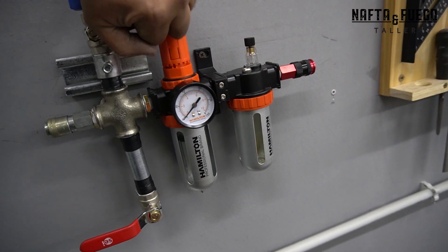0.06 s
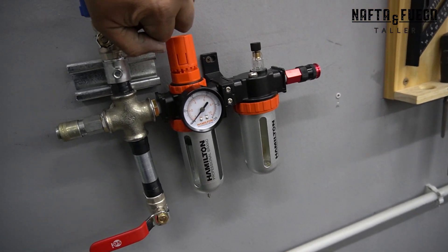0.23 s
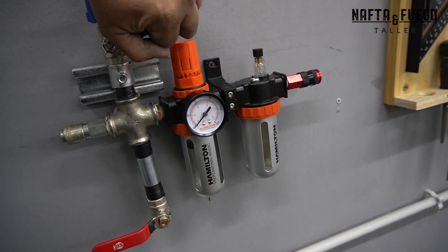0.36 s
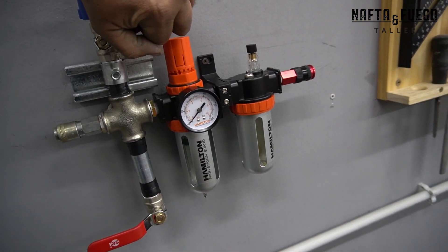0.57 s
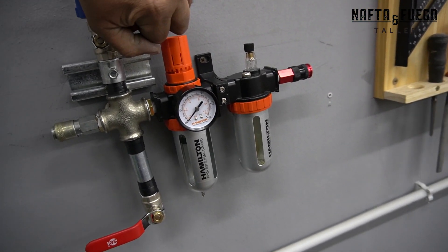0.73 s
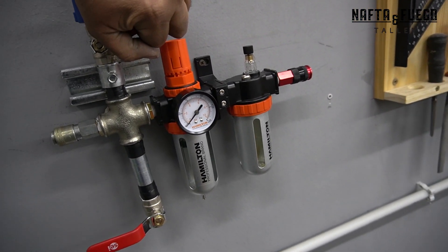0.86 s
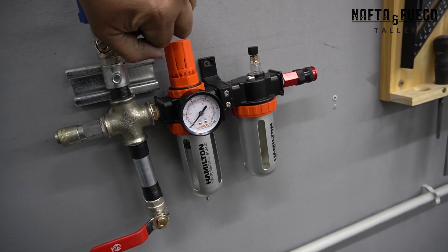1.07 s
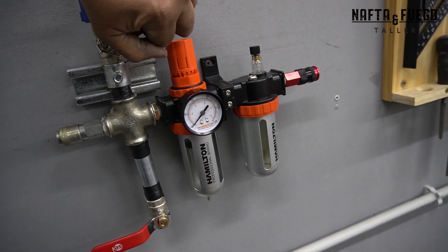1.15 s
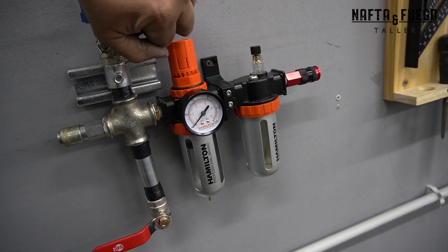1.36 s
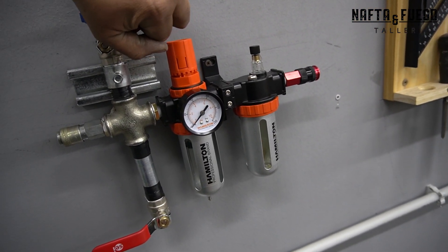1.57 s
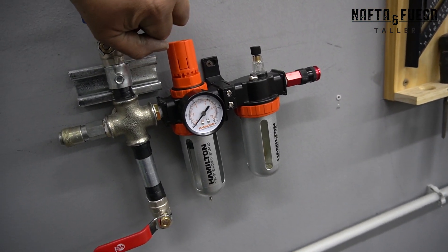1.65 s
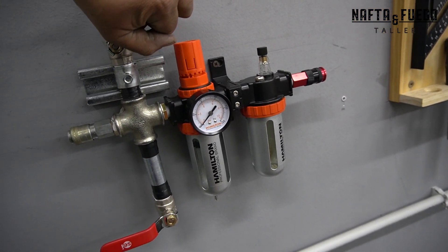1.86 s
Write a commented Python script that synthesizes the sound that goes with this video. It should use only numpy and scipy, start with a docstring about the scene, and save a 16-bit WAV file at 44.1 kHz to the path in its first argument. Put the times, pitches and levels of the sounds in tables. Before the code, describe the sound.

A compressed-air valve is turned by hand: soft rub, a quick crackling burst of air, one loud metallic snap, then a resonant hiss fading within half a second; dull knocks follow. Close stereo microphones, small workshop.

```python
"""A compressed-air valve, turned open by hand in a small workshop, heard close by on two microphones.
Air (shaped noise) swells through the gap; the valve catches and snaps home (cracks, metal rings, a pop).
The regulator bowls fill with a fading, resonant hiss; a thin leak stays and a broader hiss grows late.
Around it: the hand's rub, a faint squeak (gliding tones), the snap's low thump and later dull knocks
(decaying sines, two with a slight rattle), a tiny whistle (a gliding tone) and low room rumble (noise)."""
import sys
import numpy as np
from scipy import signal
from scipy.fft import rfft, irfft
from scipy.io import wavfile

SR = 44100
rng = np.random.default_rng(int(sys.argv[2]) if len(sys.argv) > 2 else 0)


def unload_audio(sound):
    """Save the sound as a 16-bit wav file, at the path given as the first command line argument."""
    columns = np.transpose(np.atleast_2d(sound))
    # keep every value between -1 and 1, then stretch to whole-number steps
    steps = np.round(np.clip(columns, -1, 1) * 32767)
    wavfile.write(sys.argv[1], SR, steps.astype(np.int16))


N = 83790  # length [samples], 1.9 s
TIME = np.arange(N) / SR  # [s]
FREQUENCY = np.arange(N // 2 + 1) * SR / N  # [Hz]


def undb(db):
    """Decibels to gain."""
    return 10 ** (np.asarray(db) / 20)


def curve(rows):
    """Gain over time from (time [s], level [dB]) points; silent before the first."""
    times, levels = np.array(rows, float).T
    return undb(np.interp(TIME, times, levels)) * (TIME >= times[0])


def lows(x, hz):
    """Gentle low-pass that adds no delay."""
    sos = signal.butter(2, min(hz, SR * .45), fs=SR, output="sos")
    return signal.sosfiltfilt(sos, x)


def waver(hz):
    """Random wandering up to a given rate, spread 1."""
    slow = lows(rng.standard_normal(N + SR), hz)
    x = slow[SR // 2:SR // 2 + N]  # away from the filter's edges
    return x / x.std()


def burst(start, decay):
    """Sudden onset, exponential fall."""
    age = TIME - start
    return (age >= 0) * np.exp(-np.abs(age) / decay)


def noise(colour, peaks=()):
    """Noise of rms 1 with a broad colour, and resonances or notches on top."""
    hz, db = np.array(colour, float).T
    shape = np.interp(np.log(np.maximum(FREQUENCY, 1)), np.log(hz), db)
    for centre, width, lift in peaks:
        shape = shape + lift / (1 + (2 * (FREQUENCY - centre) / width) ** 2)
    x = irfft(rfft(rng.standard_normal(N)) * undb(shape), N)
    return x / x.std()


MICROPHONE_LAG_S = .000016


def microphones(x):
    """The sound reaches the left microphone a little before the right."""
    delay = np.exp(-2j * np.pi * FREQUENCY * MICROPHONE_LAG_S)
    return np.array([x, irfft(rfft(x) * delay, N)])


ALIKE_BELOW_HZ, BASS_SCATTER = 1100, .3  # BASS_SCATTER: each side's own share of the lows


def scatter(n):
    """Two scattered fields from three noises: the long waves reach both microphones nearly alike."""
    own = lows(n[:2], ALIKE_BELOW_HZ)
    common = lows(n[2], ALIKE_BELOW_HZ)
    return n[:2] - own + BASS_SCATTER * own + np.sqrt(1 - BASS_SCATTER ** 2) * common


# share of the power common to both microphones
AIR_LIKENESS, HISS_LIKENESS, CLICK_LIKENESS = .72, .45, .8


def wide(colour, likeness, peaks=()):
    """Stereo noise: a part shared by both microphones and a part scattered by the wall."""
    scattered = scatter(np.array([noise(colour, peaks) for _ in range(3)]))
    shared = microphones(noise(colour, peaks))
    return np.sqrt(likeness) * shared + np.sqrt(1 - likeness) * scattered


def pan(x, db):
    """Leans a stereo sound to the left by db (negative: to the right)."""
    return x * undb(np.array([[db], [-db]]) / 2)


# 60 dB decay of the lows and of the treble, wait before the first reflection
ROOM_T60_S, ROOM_TREBLE_T60_S, ROOM_DELAY_S = .57, .14, .0068
ROOM_SPLIT_HZ = 7000


def room(x, wet_db):
    """Adds the diffuse workshop tail; the treble dies sooner."""
    n = scatter(rng.standard_normal((3, N)))
    low = lows(n, ROOM_SPLIT_HZ)
    low_tail = low * undb(-60 * TIME / ROOM_T60_S)
    treble_tail = (n - low) * undb(-60 * TIME / ROOM_TREBLE_T60_S)
    tail = (low_tail + treble_tail) * (TIME > ROOM_DELAY_S)
    tail = tail / np.sqrt(np.sum(tail ** 2) / 2)
    return x + undb(wet_db) * signal.fftconvolve(x, tail, axes=1)[:, :N]


# colour of the room's rumble: (frequency [Hz], level [dB])
RUMBLE_COLOUR = [(20, -17), (40, -2), (62, 7), (90, -0.5), (140, -3), (200, -17), (280, -24.5), (430, -21),
                 (700, -51), (1500, -56), (4000, -71), (15000, -60)]
RUMBLE_DB, RUMBLE_SCATTER_DB = -58, -42  # scatter: relative to the shared rumble


def rumble():
    """Low room noise, nearly the same at both microphones."""
    shared = microphones(noise(RUMBLE_COLOUR))
    scattered = np.array([noise(RUMBLE_COLOUR) for _ in range(2)])
    return undb(RUMBLE_DB) * (shared + undb(RUMBLE_SCATTER_DB) * scattered)


# level of the hand's rub: (time [s], level [dB])
RUB_LEVEL = [(0, -67.5), (.11, -69), (.2, -78), (.3, -95)]
# colour of the rub: (frequency [Hz], level [dB])
RUB_TONE = [(200, -17.5), (420, 5), (900, -12.5), (1800, -13.5), (2150, -6), (2700, -19), (3600, -30),
            (9000, -35.5), (11000, -57)]


def rub():
    """The hand rubs on the valve: soft noise, mostly low-pitched, that fades."""
    return wide(RUB_TONE, AIR_LIKENESS) * curve(RUB_LEVEL)


def gliding_tone(rows, wobble, ratio=1):
    """A thin unsteady sine along (time [s], frequency [Hz], level [dB]) points."""
    times, hz, db = np.array(rows, float).T
    pitch = ratio * np.interp(TIME, times, hz) * (1 + wobble * waver(730))
    level = undb(np.interp(TIME, times, db)) * (TIME > times[0]) * (TIME < times[-1])
    return microphones(level * np.sin(2 * np.pi * np.cumsum(pitch) / SR))


# glide of the squeak's lower partial: (time [s], frequency [Hz], level [dB])
SQUEAK_GLIDE = [(.05, 7400, -104), (.08, 8400, -90), (.11, 8950, -93), (.165, 9350, -96)]
SQUEAK_RATIO, SQUEAK_UPPER_DB = 1.075, -1  # upper partial against the lower
SQUEAK_WOBBLE = .02  # spread of the pitch, as a share
SQUEAK_FLICKER_DB, SQUEAK_FLICKER_HZ = 4, 60


def squeak():
    """The turning valve squeaks faintly: two rising, wobbling partials that flicker in level together."""
    lower = gliding_tone(SQUEAK_GLIDE, SQUEAK_WOBBLE)
    upper = gliding_tone(SQUEAK_GLIDE, SQUEAK_WOBBLE, SQUEAK_RATIO)
    flicker = undb(SQUEAK_FLICKER_DB * waver(SQUEAK_FLICKER_HZ))
    return (lower + undb(SQUEAK_UPPER_DB) * upper) * flicker


# level of the rush through the opening valve: (time [s], level [dB])
RUSH_LEVEL = [(.158, -79), (.176, -57.5), (.186, -52), (.2, -42.5), (.224, -34), (.244, -30.5), (.255, -54),
              (.28, -82), (.34, -110)]
# colour of the rush: (frequency [Hz], level [dB])
RUSH_TONE = [(200, -40), (700, -35), (1200, -13.5), (1800, -12), (2600, 0), (3500, -6.5), (4500, 0.5),
             (6600, -8.5), (8000, -5.5), (8800, -7), (9900, 4), (11400, -5.5), (12800, 4.5), (13600, -3.5),
             (16000, -3.5)]
RUSH_SPLIT_HZ, RUSH_LOW_LAG_S = 5000, .015  # the lows come in as the gap widens
CRACKLE_HZ, CRACKLE_DB = 505, 1  # quick unevenness: top rate, spread


def rush():
    """Air swells and crackles through the widening gap, treble first."""
    jet = wide(RUSH_TONE, AIR_LIKENESS) * undb(CRACKLE_DB * waver(CRACKLE_HZ))
    low = lows(jet, RUSH_SPLIT_HZ)
    flow = curve(RUSH_LEVEL)
    late_flow = np.interp(TIME - RUSH_LOW_LAG_S, TIME, flow)
    # the lows rise late but fall with the treble
    return (jet - low) * flow + low * np.minimum(flow, late_flow)


# clicks of the slipping valve: small catches, the loud snap home, one faint click after:
# (time [s], level [dB])
CLICK_EVENTS = [(0.205, -40), (0.218, -28.5), (0.2278, -26), (0.2309, -26.5), (0.2394, -24),
                (0.2411, -25.5), (.2482, -19), (0.2609, -39)]
# short ring of the valve body: (frequency [Hz], level [dB], 60 dB decay [s])
BODY_MODES = [(1320, -11.5, 0.0051), (2374, -7.5, 0.02), (2902, -8, 0.023), (4373, -8.5, 0.025),
              (4820, -6.5, 0.04), (5380, -10.5, .022), (7250, -15, 0.019), (7710, -6.5, 0.017),
              (7947, -9, 0.015), (8048, -16, 0.021), (11950, -16, .03)]
# colour of the crack that starts each click: (frequency [Hz], level [dB])
CRACK_TONE = [(300, -29), (900, -27), (1400, -21), (2400, 3), (3500, -5.5), (4900, 4), (6200, -5),
              (8000, 5), (9000, -9), (12000, -0.5), (16000, -20)]
BODY_DB, CRACK_DB = -5, -.5  # relative to the click
CRACK_S, CONTACT_S = .0018, .00022  # decay of the crack, rise of each click


def clicks():
    """Every click gives a sharp crack and rings the metal body as decaying sines."""
    out = 0
    for start, db in CLICK_EVENTS:
        age = np.maximum(TIME - start, 0)
        ring = 0
        for hz, mode_db, t60 in BODY_MODES:
            phase = 2 * np.pi * (hz * age + rng.random())
            ring = ring + undb(mode_db - 60 * age / t60) * np.sin(phase)
        crack = wide(CRACK_TONE, CLICK_LIKENESS) * burst(start, CRACK_S)
        contact = 1 - np.exp(-age / CONTACT_S)
        click = undb(BODY_DB) * microphones(ring) + undb(CRACK_DB) * crack
        out = out + undb(db) * click * contact
    return out


RUSH_ROOM_DB, CLICK_ROOM_DB = -6, -10.5
PAN_SPLIT_HZ, LOW_PAN_DB, HIGH_PAN_DB = 3500, -2.8, 1


def valve():
    """Rush and clicks in the room: below the split they lean right, the treble left; the pop is central."""
    out = room(rush(), RUSH_ROOM_DB) + room(clicks(), CLICK_ROOM_DB)
    low = lows(out, PAN_SPLIT_HZ)
    return pan(low, LOW_PAN_DB) + pan(out - low, HIGH_PAN_DB) + pop()


# level of the thin leak: (time [s], level [dB])
LEAK_LEVEL = [(.2, -91), (.4, -65), (.9, -58), (1.2, -56.5), (1.5, -58.5), (1.9, -57)]
# colour of the leak: (frequency [Hz], level [dB])
LEAK_TONE = [(1000, -24), (2300, -27.5), (3300, -33.5), (5200, -32.5), (6100, -23), (7500, -19),
             (8200, -15.5), (10500, -14), (11500, -6), (13500, -0.5), (16000, -10)]


def leak():
    """A thin, treble-heavy hiss grows and stays on, slightly to the left."""
    return pan(wide(LEAK_TONE, HISS_LIKENESS) * curve(LEAK_LEVEL), .5)


# level of the hiss that fills the bowls: (time [s], level [dB])
FILL_LEVEL = [(.235, -63), (.262, -42.5), (.33, -44), (.39, -46.5), (.435, -45.5), (.55, -48), (.61, -52.5),
              (.66, -55.5), (.72, -60.5), (.85, -72.5)]
# colour of the filling hiss: (frequency [Hz], level [dB])
FILL_TONE = [(300, -8.5), (900, -17.5), (1700, -18.5), (4200, -15), (6000, -1), (8400, -5), (11000, -5),
             (13000, 0), (16000, -6)]
# resonances of the air passages and one notch (negative lift): (frequency [Hz], width [Hz], lift [dB])
PASSAGE_SHAPE = [(2380, 1100, 12), (3585, 180, 13.5), (5050, 63, 14.5), (5236, 156, -28), (5940, 1040, 6),
                 (6960, 190, 6), (7960, 130, 8.5), (9440, 520, 7), (9980, 250, 9), (12190, 1090, 11),
                 (12900, 890, 3.5), (15000, 630, 12.5)]


def fill():
    """The bowls fill through ringing passages: resonant noise and the jet's notes, leaning left."""
    hiss = wide(FILL_TONE, HISS_LIKENESS, PASSAGE_SHAPE) * curve(FILL_LEVEL)
    return pan(hiss + singing(), 1.8)


# low thump of the valve's snap (first two rows), then dull knocks in the fitting:
# (time [s], level [dB], pitch [Hz], decay [s], rattle level [dB])
THUD_EVENTS = [(0.2493, -24, 323, 0.00096, -46), (0.2495, -40, 150, 0.0027, -78),
               (0.5294, -36, 312, 0.0025, -99), (1.0138, -27.5, 255, 0.0033, -53),
               (1.0237, -28.5, 262.5, 0.0071, -75), (1.0409, -35.5, 219, 0.0086, -77)]
# colour of the rattle: (frequency [Hz], level [dB])
RATTLE_TONE = [(500, 7.5), (900, -6), (1200, -1.5), (1700, -13), (2100, 0.5), (2800, -1.5), (3400, -21),
               (5500, -16), (6500, 1), (7700, -16), (10300, -4), (11000, 11), (11700, -9.5), (16000, 0.5)]
THUD_RISE_S, RATTLE_S = .00049, .02  # rise of a thud, decay of a rattle
THUD_TOP_HZ, THUD_ROOM_DB = 480, -16


def thump_and_knocks():
    """Short low thuds (decaying sines), two of them with a slight rattle, in the room."""
    thuds, shake = 0, 0
    for start, db, hz, decay, rattle_db in THUD_EVENTS:
        age = np.maximum(TIME - start, 0)
        envelope = (1 - np.exp(-age / THUD_RISE_S)) * np.exp(-age / decay)
        thuds = thuds - undb(db) * envelope * np.sin(2 * np.pi * hz * age)
        shake = shake + undb(rattle_db) * burst(start, RATTLE_S)
    rattle = shake * wide(RATTLE_TONE, AIR_LIKENESS)
    return room(microphones(lows(thuds, THUD_TOP_HZ)) + rattle, THUD_ROOM_DB)


# colour of the pop of pressure: (frequency [Hz], level [dB])
POP_TONE = [(100, -26), (300, -2), (600, 2), (900, -7.5), (1300, 0), (2200, -13.5), (8000, -45)]
POP_S, POP_DB, POP_DECAY_S, POP_ROOM_DB = .2495, -31, .0017, -5


def pop():
    """The valve seats with a short hollow pop of pressure that carries into the room."""
    puff = microphones(noise(POP_TONE)) * burst(POP_S, POP_DECAY_S)
    return room(undb(POP_DB) * puff, POP_ROOM_DB)


# notes of the jet as the bowls fill: (pitch [Hz], width [Hz], level [dB], loudest at [s], swell [s])
SUNG_NOTES = [(2610, 400, -57, .33, 0.084), (7070, 185, -54, .37, 0.11), (12350, 760, -50.5, 0.37, 0.096),
              (15400, 600, -64, 0.36, 0.075)]
JET_ONSET_S = .03  # the notes build up once the valve has seated
JET_RISE_PER_S = .06  # share by which the notes climb as the pressure builds


def singing():
    """Airy notes of the jet, narrow bands of noise, swell and fade close together, climbing slightly."""
    out = 0
    for hz, width, db, peak, swell in SUNG_NOTES:
        pitch = hz * (1 + JET_RISE_PER_S * (TIME - peak))
        phase = 2 * np.pi * np.cumsum(pitch) / SR
        # random sine and cosine parts spread each note into a band
        shared, left, right = (
            waver(width / 2) * np.sin(phase) + waver(width / 2) * np.cos(phase) for _ in range(3))
        own = np.array([left, right])
        note = np.sqrt(HISS_LIKENESS) * microphones(shared) + np.sqrt(1 - HISS_LIKENESS) * own
        out = out + undb(db) * np.exp(-((TIME - peak) / swell) ** 2 / 2) * note
    return out * np.clip((TIME - POP_S) / JET_ONSET_S, 0, 1)


# level of a broader hiss that grows late: (time [s], level [dB])
SEEP_LEVEL = [(1.15, -82), (1.45, -65.5), (1.65, -61.5), (1.9, -60)]
# colour of the broader hiss: (frequency [Hz], level [dB])
SEEP_TONE = [(400, -5), (800, -14), (1500, -18.5), (2100, -6), (3200, -18), (4000, -15.5), (5200, -14.5),
             (6500, -4), (10000, -4.5), (16000, -3.5)]


def seep():
    """A broader hiss joins the leak late, leaning left."""
    return pan(wide(SEEP_TONE, HISS_LIKENESS) * curve(SEEP_LEVEL), 2.0)


# glide of the leak's tiny whistle: (time [s], frequency [Hz], level [dB])
WHISTLE_GLIDE = [(1.366, 10000, -80), (1.373, 10450, -61), (1.386, 10530, -59), (1.404, 10250, -64),
                 (1.417, 8650, -68), (1.428, 7850, -66), (1.436, 6800, -82)]
WHISTLE_WOBBLE = .003  # spread of the pitch, as a share


def whistle():
    """The leak whistles briefly: one thin tone that edges up, then slides down."""
    return gliding_tone(WHISTLE_GLIDE, WHISTLE_WOBBLE)


def scene():
    """The hand turns the squeaking valve; hiss, knocks and a whistle follow over the workshop's rumble."""
    hand = rub() + squeak()
    air = leak() + fill() + seep() + whistle()
    return rumble() + hand + valve() + air + thump_and_knocks()


RUMBLE_CUT_HZ, TOP_HZ = 35, 15750


def record(dry):
    """The recorder thins the deepest bass and cuts the top steeply."""
    bass_cut = signal.butter(2, RUMBLE_CUT_HZ, "highpass", fs=SR, output="sos")
    top_cut = signal.ellip(12, .2, 80, TOP_HZ, fs=SR, output="sos")
    return signal.sosfilt(top_cut, signal.sosfilt(bass_cut, dry))


dry = scene()
out = record(dry)
unload_audio(out)
```